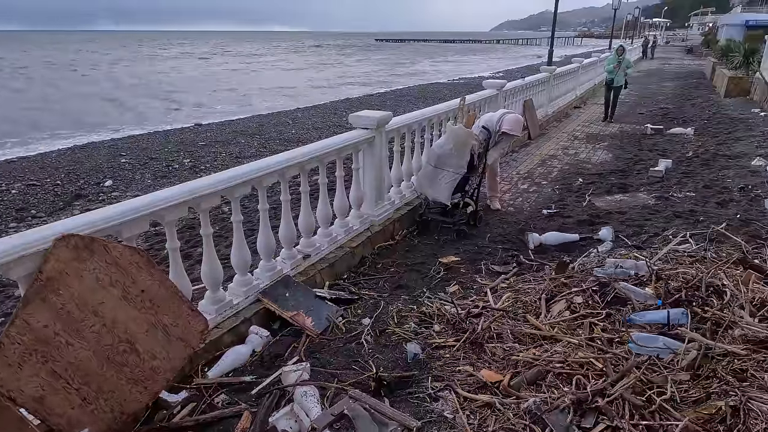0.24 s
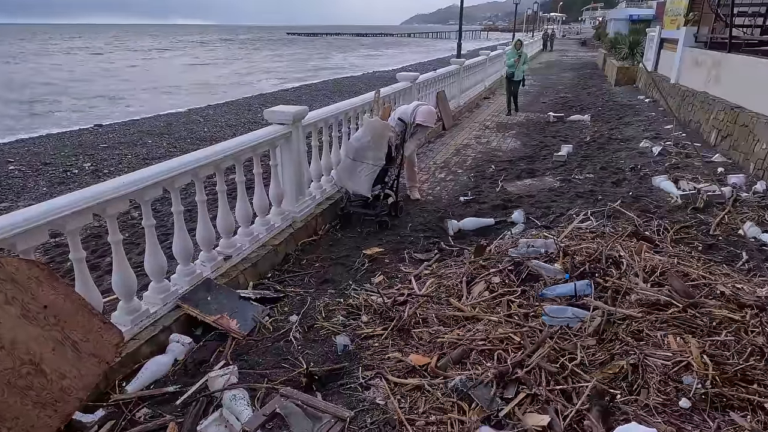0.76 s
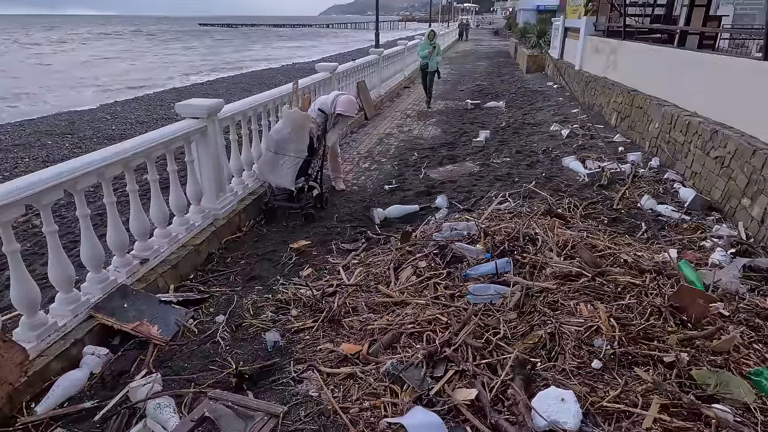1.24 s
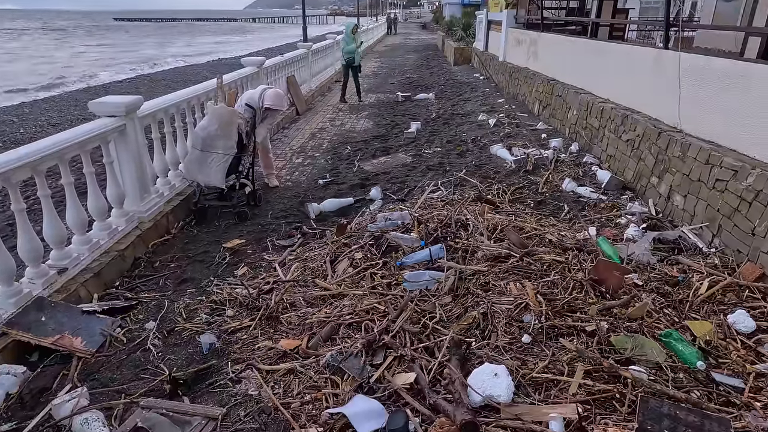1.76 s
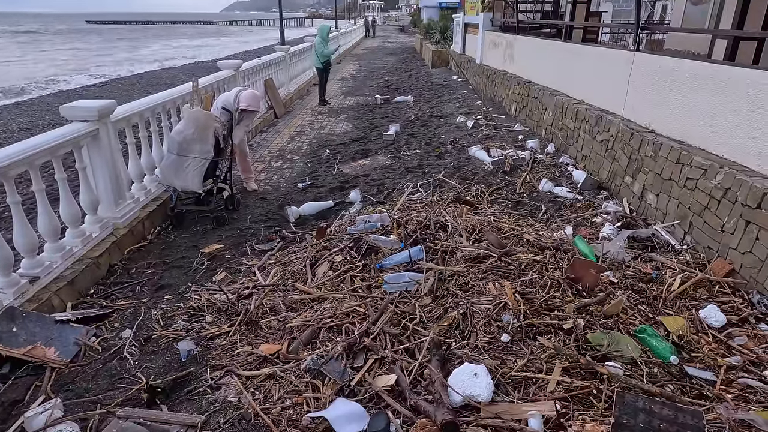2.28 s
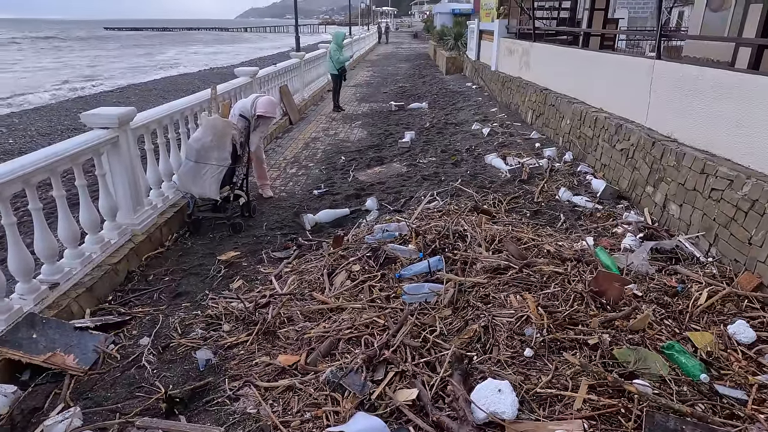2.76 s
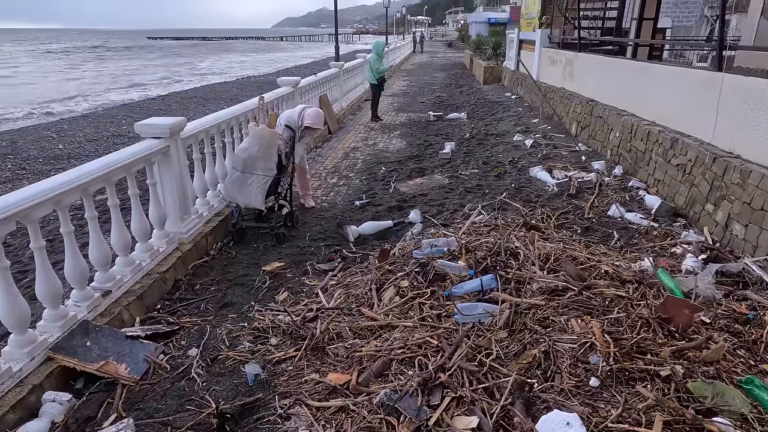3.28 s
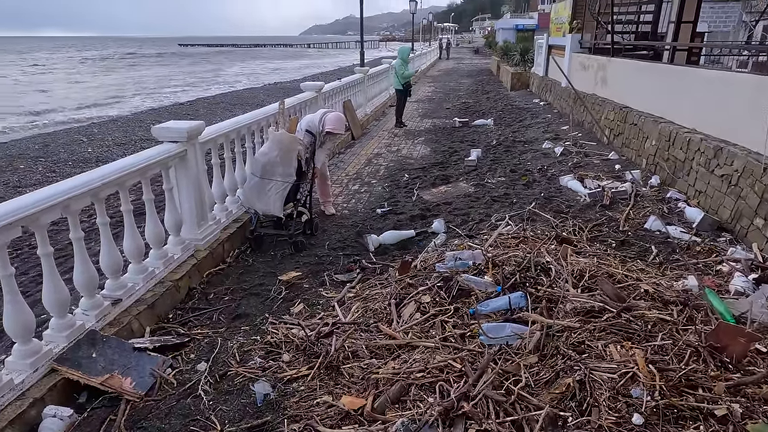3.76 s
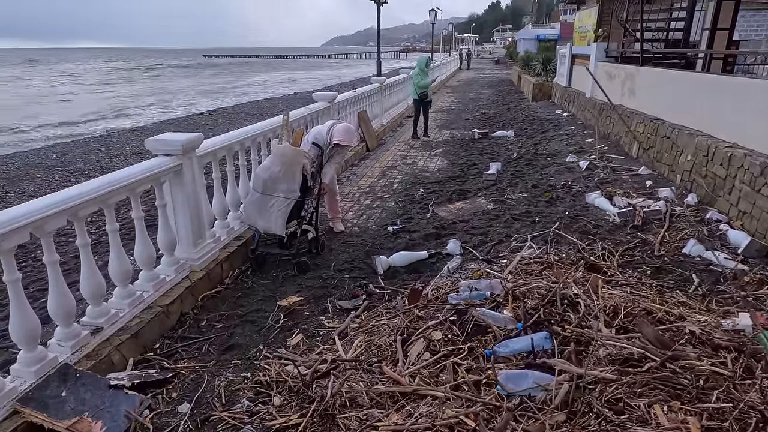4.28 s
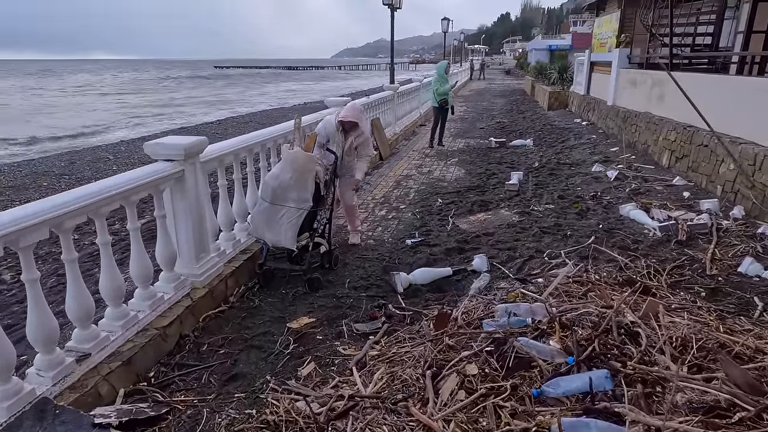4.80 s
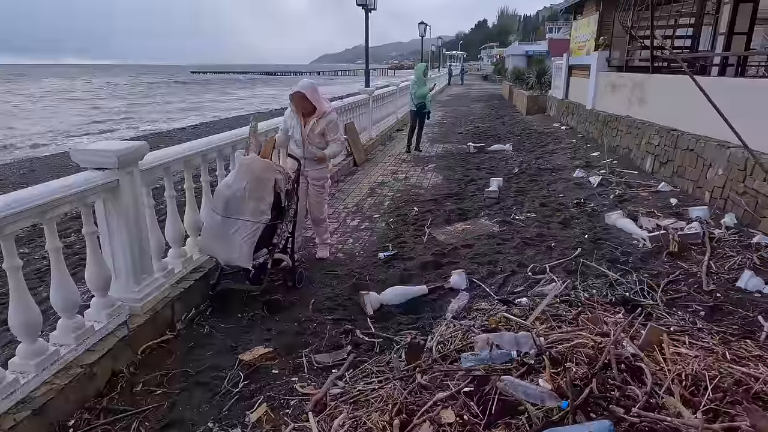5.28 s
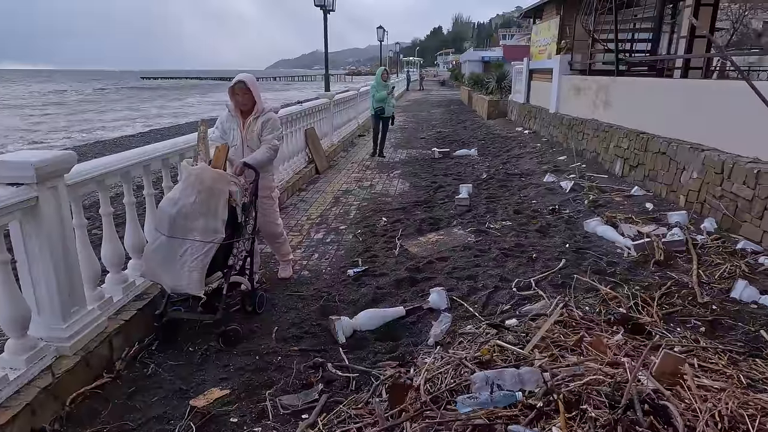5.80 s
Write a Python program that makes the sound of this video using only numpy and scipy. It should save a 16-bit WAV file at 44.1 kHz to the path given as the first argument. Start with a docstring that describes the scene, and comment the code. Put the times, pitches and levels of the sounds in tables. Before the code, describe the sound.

Storm surf drains, then breaks in a long roar with fizzing foam on pebbles, amid faint scuffs, wind buffets, a thump and a hollow wooden knock.

```python
"""Storm surf on a pebble beach, heard from the promenade above it through a hand-held camera.
A wave drains away as feet scuff the debris nearby, now and then throughout, and the camera is bumped once.
The next wave then breaks with a roar and its foam fizzes up the stones, while gusts buffet the microphone;
near the end comes a hollow knock on wood. Water, wind and grit are shaped noise; bump and knock are
decaying sines. The camera colours the mix and limits its peaks."""
import sys
import numpy as np
from scipy import signal
from scipy.fft import rfft, irfft, next_fast_len
from scipy.io import wavfile
from scipy.ndimage import uniform_filter1d

SR = 44100
rng = np.random.default_rng(int(sys.argv[2]) if len(sys.argv) > 2 else 0)


def gain_from_decibels(decibels):
    """Convert decibel values to linear amplitude factors."""
    exponent = np.asarray(decibels, float) / 20
    return 10 ** exponent


def generate_wav(signal):
    """Clip the signal to [-1, 1] and save it as 16-bit WAV at the path in sys.argv[1]."""
    frames = np.transpose(np.atleast_2d(signal))
    scaled = np.clip(frames, -1, 1) * 32767
    pcm = np.round(scaled).astype(np.int16)
    wavfile.write(sys.argv[1], SR, pcm)


N = 266364  # length in samples

# Course of the waves: start_s, roar_level_db, roar_tilt_db_per_octave, fizz_level_db
WAVE = [(0, -28, -6, -33.5), (.5, -30, -7, -33), (.66, -32, -6.5, -36.5), (.85, -35, -6.5, -38),
        (1.3, -32.5, -4.5, -37.5), (1.6, -28.5, -3.5, -37), (2.05, -26.5, -3, -36), (2.5, -25.5, -2, -34),
        (2.9, -25.5, -1.5, -32.5), (3.4, -25, .5, -30), (4.1, -23.5, -1, -29.5), (4.7, -23.5, -1.5, -30),
        (5.1, -24, -2.5, -30.5), (5.7, -24.5, -1.5, -31), (6.04, -25.5, -5, -29.5)]


def evened(x):
    """Normalization: scales a signal to an rms of 1."""
    return x / np.sqrt(np.mean(x ** 2) + 1e-20)


def read(points, hz):
    """Interpolation of a spectrum along a logarithmic frequency axis."""
    f, value = np.transpose(points)
    return np.interp(np.log(hz + 1), np.log(f + 1), value)


def curve(rows, column):
    """Linear interpolation in time: one table column at every sample."""
    rows = np.array(rows)
    return np.interp(np.arange(N) / SR, rows[:, 0], rows[:, column])


def add(mix, start_s, sound):
    """Superposition: adds a sound to the mix from start_s onward."""
    part = mix[round(start_s * SR):][:len(sound)]
    part += sound[:len(part)]


def noise(spectrum, size, patchy_db, flicker_db, tilt_db=np.zeros(N), pivot_hz=1000):
    """Short-time synthesis: random spectra with drifting patches, a flicker shared by all bins, a moving tilt."""
    hop = size // 4
    frames = N // hop + 5
    hz = np.fft.rfftfreq(size, 1 / SR)
    real, imaginary, patches = rng.standard_normal((frames, len(hz), 3)).T
    patches = uniform_filter1d(patches, size=12, axis=0)  # across frequency
    patches = evened(uniform_filter1d(patches, size=10, axis=1))  # across time
    flicker = evened(uniform_filter1d(rng.standard_normal(frames), size=3))
    frame_tilt = tilt_db[np.minimum(np.arange(frames) * hop, N - 1)]  # dB per octave
    octaves = np.log2((hz[:, None] + 1) / pivot_hz)
    field_db = read(spectrum, hz)[:, None] + frame_tilt * octaves
    field_db = field_db + patchy_db * patches + flicker_db * flicker
    field = (real + 1j * imaginary) * gain_from_decibels(field_db)
    sound = signal.istft(field, nperseg=size, noverlap=size - hop)[1]
    return evened(sound[:N])


def wind():
    """Turbulence: eddies at the microphone port make all low frequencies jump together; gusts top the breeze."""
    # Relative spectrum: frequency_hz, level_db
    buffet = [(10, -36), (25, -18), (50, -8), (100, -2.5), (180, -5), (350, -37), (1000, -89.5)]
    # Wind between gusts: start_s, level_db
    breeze = [(0, -52), (.6, -56.5), (1.9, -69), (3.3, -60), (4.8, -72), (6.04, -59.5)]
    # Gusts on the microphone: peak_s, level_db, length_s
    gusts = [(1.45, -67, 0.18), (2.417, -43, .2), (2.7, -55, 0.46), (3.522, -58, .12), (3.9, -50, 0.23),
             (4.22, -49.5, 0.22), (4.6, -58, .08), (5.06, -43, 0.23), (5.418, -46, .2), (5.8, -52, .25)]
    gust_fall_db = 19  # drop one length before and after the peak
    t = np.arange(N) / SR
    level = gain_from_decibels(curve(breeze, column=1))
    for peak_s, level_db, length_s in gusts:
        level += gain_from_decibels(level_db - gust_fall_db * abs(t - peak_s) / length_s)
    return level * noise(buffet, size=2048, patchy_db=0, flicker_db=3.0)


def scuffs():
    """Friction: each scuff is a short puff of gritty hiss, quick to rise and slower to fade."""
    # Relative spectrum: frequency_hz, level_db
    grit_spectrum = [(2500, -19), (4500, -4), (7000, -2), (9000, -19), (10500, -12), (12500, -30),
                     (15000, -41.5)]
    # Feet scuffing debris: start_s, level_db, length_s
    strokes = [(.28, -54, .14), (.6, -56, .05), (1.17, -52, .07), (1.66, -56, .11), (1.88, -57, .07),
               (3.88, -57, .12), (4.72, -52, .16), (5.19, -54, .06)]
    grit = noise(grit_spectrum, size=256, patchy_db=1.5, flicker_db=0.6)
    envelope = np.zeros(N)
    for start_s, level_db, length_s in strokes:
        progress = np.arange(round(length_s * SR)) / (length_s * SR)
        add(envelope, start_s, gain_from_decibels(level_db) * np.sin(np.pi * progress ** 0.7))  # early peak
    return grit * envelope


def bump():
    """Heavily damped motion: a push on the camera body is a sine that slows as it dies."""
    # One push: level_db before the rise, first_hz, last_hz, pitch_fall_s, rise_s, t60_s
    level_db, first_hz, last_hz, pitch_fall_s, rise_s, t60_s = (-4.5, 140, 33, .011, .006, .05)
    t = np.arange(SR // 10) / SR
    pitch_hz = last_hz + (first_hz - last_hz) * np.exp(-t / pitch_fall_s)
    turns = np.cumsum(pitch_hz) / SR
    envelope = gain_from_decibels(level_db - 60 * t / t60_s) * np.minimum(t / rise_s, 1)
    return envelope * np.sin(2 * np.pi * turns)


def knock(level_db, rise_s):
    """Modal resonance: a soft blow rings the low modes of a piece of wood."""
    # Modes of the wood: pitch_hz, level_db relative to the knock, t60_s
    wood = [(290, -2, .11), (340, 1, .13), (430, -3, .07), (590, 2, .05)]
    t = np.arange(SR // 5) / SR
    ring = np.zeros(len(t))
    for pitch_hz, mode_db, t60_s in wood:
        decay = gain_from_decibels(mode_db - 60 * np.maximum(t - rise_s, 0) / t60_s)
        ring += decay * np.sin(2 * np.pi * pitch_hz * t)
    return gain_from_decibels(level_db) * np.minimum(t / rise_s, 1) * ring


def fizz():
    """Superposed small impacts: bursting foam and pebbles rolling in the wash, smooth at this distance."""
    # Relative spectrum before the tilt: frequency_hz, level_db
    fizz_spectrum = [(600, -42), (1300, -6), (1510, -2.5), (2850, -2), (4360, -8), (5500, -15), (7110, -25),
                     (8300, -34.5), (8900, -42), (9500, -41), (10300, -38.5), (11500, -47.5), (13500, -58),
                     (15100, -70)]
    roar_db, roar_tilt, fizz_db = (curve(WAVE, column) for column in (1, 2, 3))
    # in dB per octave: it leans to the treble while the roar is dull,
    # and is duller the further its level lags behind the roar
    tilt_db = 0.74 - 0.23 * roar_tilt - 0.16 * (roar_db - fizz_db)
    foam = noise(fizz_spectrum, size=512, patchy_db=0.5, flicker_db=0.35, tilt_db=tilt_db, pivot_hz=3000)
    return gain_from_decibels(fizz_db) * foam


def roar():
    """Incoherent summation: countless large bubbles and tumbling water merge into a low band of noise."""
    # Relative spectrum before the tilt: frequency_hz, level_db
    roar_spectrum = [(30, -94.5), (110, -32), (200, -16), (300, -8), (400, -4.5), (480, -2.5), (560, 3.5),
                     (720, 2.5), (780, 0.5), (850, 3), (1000, 0.5), (1150, -1), (1350, -9.5), (2200, -34.5),
                     (6000, -90)]
    tilt_db = curve(WAVE, column=2)
    water = noise(roar_spectrum, size=2048, patchy_db=0.6, flicker_db=0.2, tilt_db=tilt_db, pivot_hz=600)
    return gain_from_decibels(curve(WAVE, column=1)) * water


def scene():
    """Linear superposition of sea, wind and the small sounds near the camera."""
    # Hollow knock on wood: start_s, level_db, rise_s
    knocks = [(5.146, -21.5, .013)]
    mix = roar() + fizz() + wind() + scuffs()
    add(mix, 0.549, bump())
    for start_s, level_db, rise_s in knocks:
        add(mix, start_s, knock(level_db, rise_s))
    return mix[None]  # one channel


def coloured(x):
    """Linear filtering: the camera's filter bank lifts a middle band; narrow dips lie where its bands meet."""
    # Favoured band: low_hz, high_hz, lift_db
    low_hz, high_hz, lift_db = (326, 895, 6)
    # Dips: centre_hz, width_hz, depth_db
    notches = [(321, 12, -9), (9050, 75, -32)]
    size = next_fast_len(N)
    hz = np.fft.rfftfreq(size, 1 / SR)
    colour_db = lift_db / (1 + (low_hz / (hz + 1)) ** 40) / (1 + (hz / high_hz) ** 40)
    for centre_hz, width_hz, depth_db in notches:
        colour_db += depth_db * np.exp(-((hz - centre_hz) / width_hz) ** 2)
    return irfft(rfft(x, size) * gain_from_decibels(colour_db), size)[:, :N]


def limited(x):
    """Dynamic range limiting: a loud peak pulls the gain down just after it; the gain then creeps back."""
    limit_db, recover_db_per_s = -15, 29
    sense_s, clamp_s = 0.0067, 0.012  # power window, gain time constant
    power = abs(uniform_filter1d(x ** 2, round(sense_s * SR)))
    power_db = 10 * np.log10(power + 1e-12)
    fall = np.arange(N) * recover_db_per_s / SR
    held_db = np.maximum.accumulate(power_db + fall, axis=1) - fall  # peaks held, then sinking
    over_db = np.maximum(held_db - limit_db, 0)
    keep = np.exp(-1 / (clamp_s * SR))
    return x / gain_from_decibels(signal.lfilter([1 - keep], [1, -keep], over_db))


def band_limit(x):
    """A steep low-pass at the top of the band."""
    return signal.sosfilt(signal.butter(12, 15100, fs=SR, output="sos"), x)


def record(dry):
    """Signal chain of the camera: spectral colouring, then limiting."""
    finished = limited(coloured(dry))
    return band_limit(finished)


dry = scene()
out = record(dry)
generate_wav(out)
```